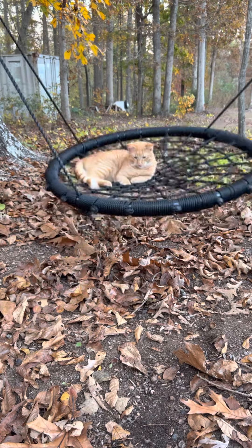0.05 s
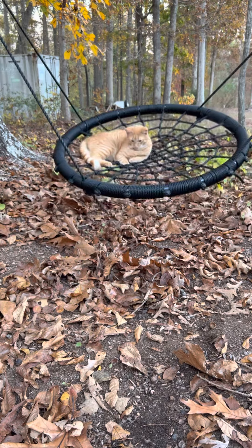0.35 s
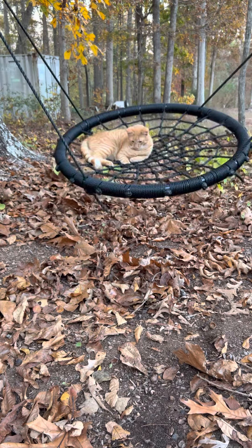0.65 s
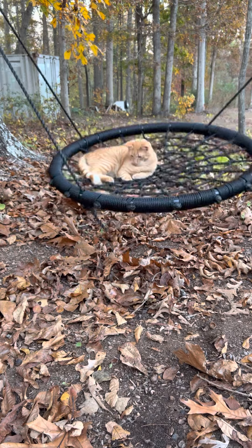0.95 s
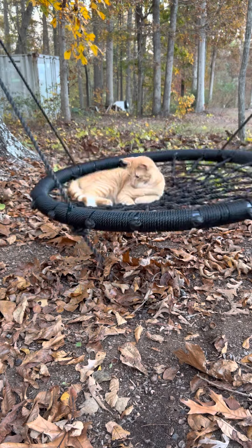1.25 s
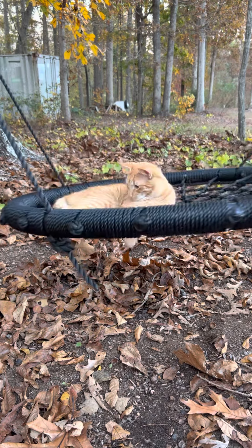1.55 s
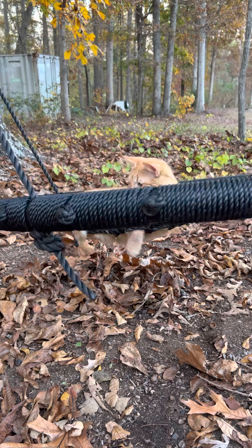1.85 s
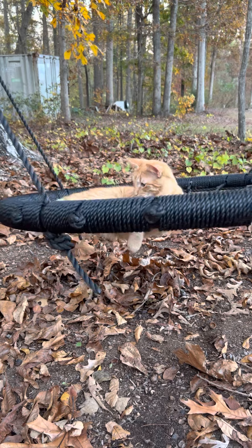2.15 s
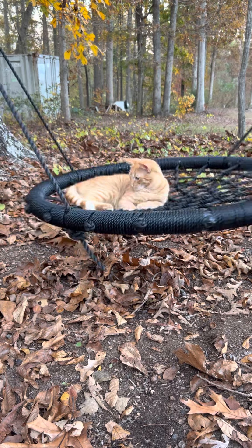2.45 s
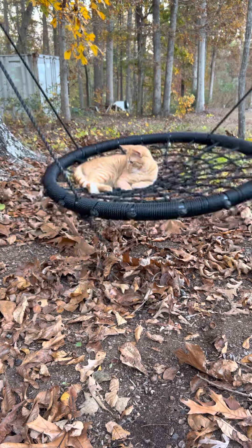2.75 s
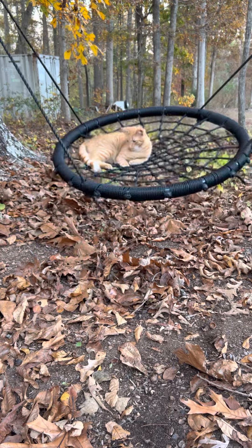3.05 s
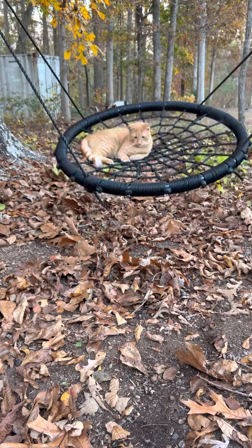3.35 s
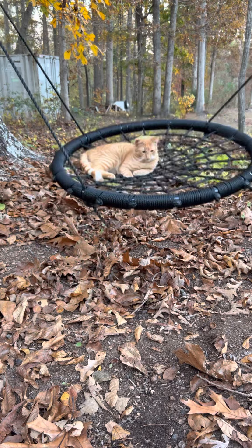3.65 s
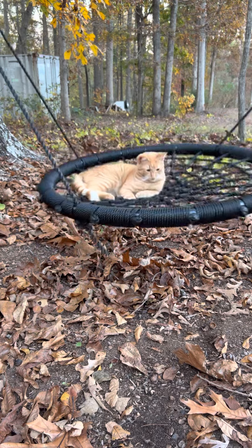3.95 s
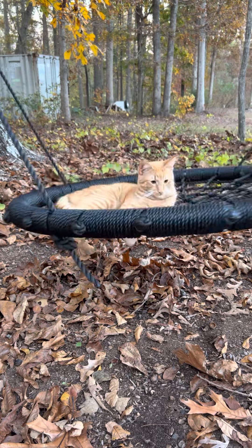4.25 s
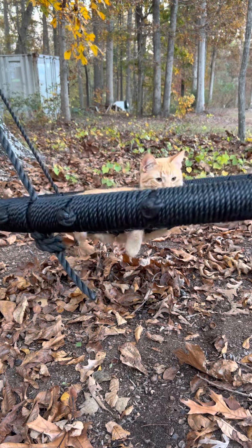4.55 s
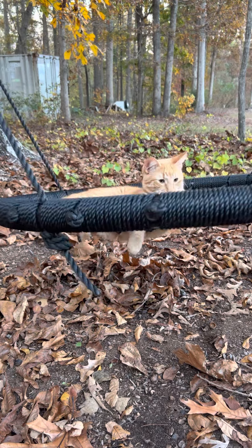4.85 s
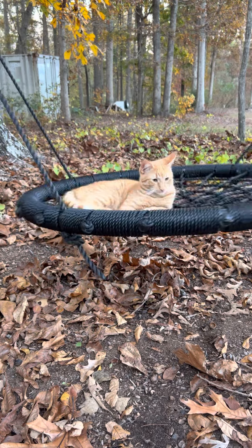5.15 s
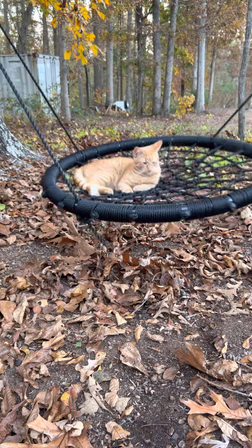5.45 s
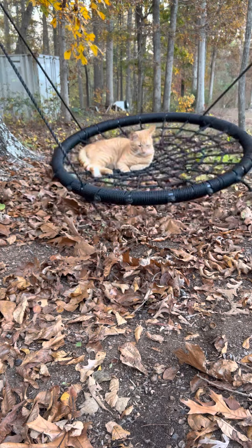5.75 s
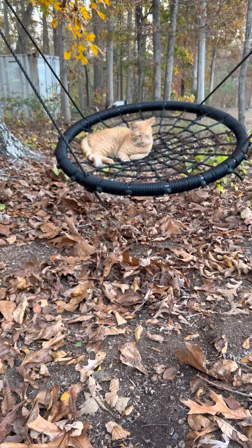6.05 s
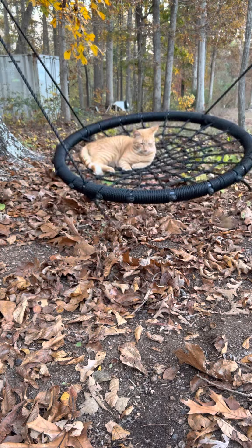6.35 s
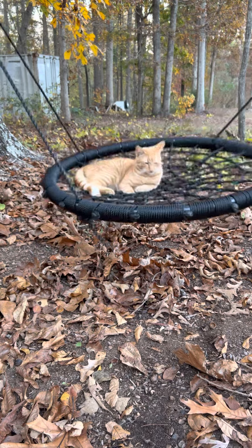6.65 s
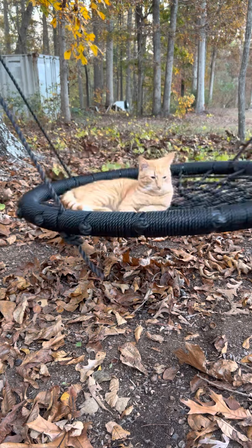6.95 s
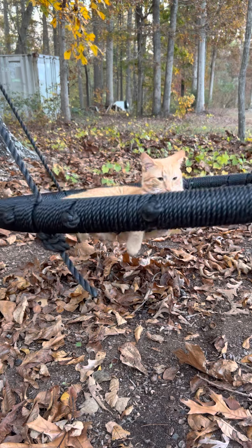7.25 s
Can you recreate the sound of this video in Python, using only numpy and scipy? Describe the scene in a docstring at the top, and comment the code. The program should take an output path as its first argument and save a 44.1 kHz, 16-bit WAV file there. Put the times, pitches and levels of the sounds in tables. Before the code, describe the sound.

A steady high cricket chorus and distant machine drone, with nearby leaf crackles, one sharp snap and a few faint bird whistles.

```python
"""A wooded yard in autumn

Close by, what is probably cloth and dry leaves rustles by stick-slip friction, with a swish, a scuff and
dull ticks; brittle fracture adds snaps and crunches. Crickets trill by stridulation in a steady high
chorus, and another insect, probably a katydid, rasps seven times. Small birds give thin whistles and
faint chucks. Beneath it all lie the harmonics of a far engine, a machine's whine, rumble and open air."""
import sys
import numpy as np
from scipy import signal
from scipy.fft import rfft, irfft
from scipy.io import wavfile
from scipy.ndimage import uniform_filter1d

SR = 44100
rng = np.random.default_rng(int(sys.argv[2]) if len(sys.argv) > 2 else 0)


def put_to_file(sound):
    """Save the sound as 16-bit audio at rate SR, in the file named by the first command-line argument."""
    columns = np.atleast_2d(sound).T  # one column per channel
    safe = np.clip(columns, -1, 1)
    whole_steps = np.round(safe * 32767)
    wavfile.write(sys.argv[1], SR, whole_steps.astype(np.int16))


N = 321930
TIME = np.arange(N) / SR
CRUMBLE_T60_S = .014  # decay time of crumbling leaf fragments


# Leaf fractures (time [s], peak level [dB], tilt [dB/octave], woody knock [dB], ring frequency [Hz])
SNAPS = [(.202, -28, -8.5, 14, 6800), (.2389, -39, -4, 2, 9500), (0.435, -42, -10, 3, 7500),
         (.4925, -39, -7, 2, 8300), (0.5228, -39, -12, 3, 5700), (.627, -42, 0, 3, 8500),
         (.643, -44, -7, 0, 7960), (.7128, -45, -8, 8, 6000), (0.7713, -32.5, -11, 12, 5400),
         (0.8898, -31, -9, 3, 6200), (0.9172, -2, 0, 12, 7800), (1.097, -41, -12.5, 3, 7400),
         (1.105, -40, -12, 3, 6000), (1.204, -28.5, 1, 13, 7300), (1.2607, -32.5, -11, 13, 6150),
         (1.3108, -34, -9, 7, 6300), (1.3534, -39, -10, 1, 7700), (1.3675, -32.5, -7, 7, 6960),
         (1.4325, -32.5, -7, 3, 7600), (1.4677, -37, -9, 4, 7000), (1.5035, -33, -11, 5, 6200),
         (1.5599, -23.5, 3.5, 8, 7000), (1.6173, -33, -14, 6, 6000), (1.6531, -35, -9, 4, 6800),
         (1.738, -43, -7, 3, 7500), (1.76, -46, 2, 2, 8500), (1.8298, -43, -9, 2, 8260),
         (1.8363, -35, -12, 4, 7300), (1.9101, -28.5, -11, 16, 6500), (1.925, -37, -3, 3, 7300),
         (2.154, -22.5, -6, 12, 7500), (2.293, -38, -12.5, 9, 5780), (2.342, -42, -5, 3, 7500),
         (2.3694, -48, -9, 5, 6600), (2.393, -44, -17, 5, 6500), (2.4667, -49, -9, 4, 6800),
         (2.605, -46, -17.5, -2, 6020), (2.778, -37.5, -6.5, 3, 8500), (2.7921, -38, 0, 5, 7000),
         (3.9287, -54, -9, 6, 6940), (4.2794, -56, -4.5, 1.5, 7500), (5.514, -48, -17, 9, 7500),
         (6.1794, -51, -18.5, 3, 7000), (6.5797, -47.5, -11.5, 3, 6500), (6.725, -46.5, -11, 6, 6300),
         (6.8788, -31, 2, 5, 7560)]
# Spectrum common to all snaps (frequency [Hz], level [dB])
SNAP_SPECTRUM = [(300, -35), (2000, -24), (3000, -16), (3650, -9), (4400, -14), (5600, -17), (6400, -8),
                 (7600, -5), (10000, -3), (13000, -5), (16000, -10)]

def snaps(knock_hz=4770, knock_width_hz=380, ring_width_hz=990, ring_db=7, lag_s=.00089, size=1024):
    """Brittle fracture: an impulse excites two resonances; weak snaps crumble more for their size."""
    hz = np.fft.rfftfreq(size, 1 / SR)
    direct, crumbs = np.zeros((2, N)), np.zeros((2, N))
    for time, db, tilt_db, knock_db, ring_hz in SNAPS:
        knock = knock_db * np.exp(-((hz - knock_hz) / knock_width_hz) ** 2)
        ring = ring_db * np.exp(-((hz - ring_hz) / ring_width_hz) ** 2)
        tilt = tilt_db * np.log2((hz + 500) / 8000)
        log_gain = np.log(gain_of(at_hz(SNAP_SPECTRUM, hz) + knock + ring + tilt))
        mirrored = np.r_[log_gain, log_gain[-2:0:-1]]
        left = np.exp(np.conj(signal.hilbert(mirrored)))[:len(hz)]  # minimum phase: a sudden onset
        right = left * np.exp(-1j * at_hz(PORT_PHASE, hz))
        snap = np.roll(irfft([left, right]), size // 2, axis=1)
        snap *= gain_of(db) / abs(snap).max()
        start = time + lag_s - size / 2 / SR
        add(direct, start, snap)
        add(crumbs, start, snap * min(.17 * gain_of(-.7 * db), .8))
    crumbling = scatter(crumbs, CRUMBLE_T60_S)
    near_echo = gain_of(-15) * scatter(direct, t60=.045)
    far_echo = gain_of(-22.5) * scatter(direct, t60=.25)
    return direct + crumbling + near_echo + far_echo


# Rubs (start [s], rise [s], fade delay [s], level [dB], fade [dB/s], fizz relative to the rub [dB])
RUBS = [(.07, .07, 0.14, -56.5, 60, -28), (.2, .01, .05, -55.5, 200, -9), (.24, 0.054, 0.11, -56, 90, -26),
        (.4, 0.02, 0.18, -58, 120, -15), (.56, 0.044, .18, -63.5, 60, -20),
        (1.03, 0.045, .11, -65.5, 60, -19), (1.155, 0.025, 0.05, -55.5, 130, -2.5),
        (1.31, 0.018, .06, -60, 100, -6), (1.372, .012, 0.049, -55.5, 100, -1),
        (1.43, .035, .095, -52, 500, -12), (1.555, 0.023, 0.095, -54, 130, -6.5),
        (1.74, 0.028, 0.095, -62, 120, -7), (1.865, 0.01, 0.075, -58.5, 190, -11),
        (2.025, .02, 0.077, -57, 130, -20), (2.15, 0.027, 0.14, -61, 60, -11),
        (2.275, 0.016, 0.11, -58, 110, -19), (2.69, 0.09, .08, -59, 100, -23),
        (2.765, 0.021, 0.077, -56, 203, -9.5), (2.82, 0.027, 0.16, -60.5, 90.5, -19),
        (3.45, 0.11, .23, -70.5, 130, -18), (3.79, .02, .2, -71.5, 73.5, -20),
        (4.12, .02, 0.035, -76.5, 150, -20), (5.165, .015, .12, -72, 36.5, -22),
        (6.89, .04, 0.064, -62.5, 86, -20), (7.17, .04, .12, -68, 100, -21)]
# Spectra of the rustle's body and of its bright fizz (frequency [Hz], level [dB])
RUSTLE_SPECTRUM = [(60, -9), (140, 9.5), (220, 1.5), (400, 7.5), (800, -4.5), (1500, -6), (2400, 3.5),
                   (3300, 1), (5500, -3.5), (7000, -5), (9000, -12), (12000, -26), (15500, -25.5)]
FIZZ_SPECTRUM = [(4000, -32), (8000, 2.5), (11000, -4), (15500, -8)]

def rustling(stir_db=-82, crackle_db=-8):
    """Friction with uneven grip: rubs shed crackles and fizz on crisp leaves, over a faint steady stir."""
    grip = gain_of(1.5 * drift(45))
    force = grip * rub_envelope([rub[:-1] for rub in RUBS])
    crisp = grip * rub_envelope([(start, rise, delay, db + fizz_db, fade)
                                 for start, rise, delay, db, fade, fizz_db in RUBS])
    body = friction(RUSTLE_SPECTRUM, PORT_BALANCE, slips_per_s=1500, spread_db=4, hiss=1.2, patchy_db=2.5)
    fizz = friction(FIZZ_SPECTRUM, PORT_BALANCE, slips_per_s=1100, spread_db=4, hiss=.9, patchy_db=3)
    return (force + gain_of(stir_db)) * body + crisp * fizz + force * gain_of(crackle_db) * crackles()


def crackles(ticks_per_s=70, width_hz=1700, spread_db=4, modes=10):
    """Damped resonance: single leaves tick at random, each ringing briefly at its own frequency."""
    ticks, radius = np.zeros(N), np.exp(-np.pi * width_hz / SR)
    for hz in np.geomspace(3000, 10000, modes):
        strength = gain_of(spread_db * np.minimum(rng.exponential(1, N), 2))
        train = strength * impulses(ticks_per_s / modes)
        poles = [1, -2 * radius * np.cos(2 * np.pi * hz / SR), radius ** 2]
        ticks += signal.lfilter([1, 0, -1], poles, train)
    spectrum = [(1000, -8.5), (5000, 4), (8000, -7.5), (15000, -17)]
    return ports(ticks + .36 * scatter(ticks, CRUMBLE_T60_S), spectrum, NEAR_COHERENCE)


# One short stroke (start [s], rise [s], fade delay [s], level [dB], fade [dB/s])
SCUFF_STROKE = (6.8145, .03, 0.066, -37.3, 270)
# Its spectrum and its left-minus-right balance (frequency [Hz], level [dB])
SCUFF_SPECTRUM = [(400, -12.5), (800, -10.5), (1400, -6.5), (1850, -13.5), (2300, -0.5), (3300, -4.5),
                  (4600, 2), (5100, -7), (5600, -8), (6100, -6.5), (9000, -13.5), (10200, -20),
                  (15500, -25)]
SCUFF_BALANCE = [(500, 6), (1000, 10), (1800, 7), (2600, -3), (3600, 14), (4350, -5), (5300, 0), (7000, 0)]

def scuff():
    """Coarse stick-slip friction, heard from one side through a level difference between the ports."""
    slips = friction(SCUFF_SPECTRUM, SCUFF_BALANCE, slips_per_s=2300, spread_db=4.5, hiss=1.26, patchy_db=2)
    return rub_envelope([SCUFF_STROKE]) * slips


# One brisk stroke (start [s], rise [s], fade delay [s], level [dB], fade [dB/s])
SWISH_STROKE = (0.77, .008, 0.09, -47.5, 170)
# Its spectrum (frequency [Hz], level [dB])
SWISH_SPECTRUM = [(400, -14.5), (800, -21), (1500, -3), (2400, 4.5), (3300, 0.5), (5000, -2), (5600, -4),
                  (7000, -2), (9000, -4), (12000, -7.5), (15500, -12)]

def swish():
    """Fast sliding friction: dense slips merge into a hiss."""
    slips = friction(SWISH_SPECTRUM, PORT_BALANCE, slips_per_s=4800, spread_db=2.5, hiss=2.2, patchy_db=3.5)
    return rub_envelope([SWISH_STROKE]) * slips


# Collapsing leaves (time [s], level [dB])
CRUNCHES = [(.628, -60.5), (1.227, -52), (1.261, -59), (1.311, -51), (1.381, -48), (1.503, -61),
            (1.832, -56), (1.912, -59), (2.045, -55.5), (2.294, -59), (2.6, -58.5), (2.79, -52),
            (6.168, -65)]
# Their spectrum (frequency [Hz], level [dB])
CRUNCH_SPECTRUM = [(400, -28), (1500, -7), (3000, 3.5), (6500, 5), (9000, 0), (15000, -19)]

def crunches(cracks_per_s=1500):
    """Cascading fracture: a dry leaf gives way in a cluster of tiny cracks that dies quickly."""
    cracks = patchy(noise() * impulses(cracks_per_s), patchy_db=2.5)
    return decays(CRUNCHES, t60=.1) * ports(cracks, CRUNCH_SPECTRUM, NEAR_COHERENCE)


# Short dull ticks (time [s], level [dB])
DULL_TICKS = [(2.298, -46.5), (3.986, -57), (4.032, -61), (4.455, -63), (5.18, -59)]
# Their spectrum (frequency [Hz], level [dB])
TICK_SPECTRUM = [(2000, -19), (3400, -2), (5300, -4), (6300, -26), (12000, -30)]

def dull_ticks():
    """Damped transients: short dull ticks, one of them the bright edge of a far chuck."""
    return decays(DULL_TICKS, t60=.061) * ports(noise(), TICK_SPECTRUM, NEAR_COHERENCE)


# Level of the far chorus (time [s], level [dB])
CHORUS_LEVEL = [(0, -62.5), (2, -62.5), (3.2, -65), (4.1, -62.5), (4.5, -64.5), (5.15, -65), (5.3, -63),
                (7.3, -63)]
# Its spectrum (frequency [Hz], level [dB])
CHORUS_SPECTRUM = [(3000, -68), (3600, -10.5), (3850, -1), (4050, 4), (4220, 6.5), (4400, -1), (4600, -3.5),
                   (4850, -51), (5500, -60)]

def cricket_chorus(wingbeats_hz=(38, 57, 71), throb=.17):
    """Incoherent summation: many far trills merge into one throbbing band of noise."""
    beats = sum(np.sin(phase_of(hz + 3 * drift(2.1))) for hz in wingbeats_hz)
    voices = patchy(noise(), patchy_db=4, size=4096)  # single voices come and go
    voices = voices * (1 + throb * unit_rms(beats))
    return ports(voices, CHORUS_SPECTRUM, FAR_COHERENCE) * gain_of(over_time(CHORUS_LEVEL))


# Nearer crickets, by name (pitch [Hz], wingbeat rate [Hz], phase lead of the left port [rad])
CRICKET_VOICES = {"nearest": (4205, 48.5, 0), "high": (4370, 74, 2.6), "middle": (4215, 66, 0),
                  "low": (4090, 72, 1.1)}
# Their trills (cricket [name], start [s], length [s], level [dB])
TRILLS = [("nearest", 0, 0.075, -61), ("nearest", 1.62, 0.19, -64), ("nearest", 3.715, 0.172, -60.5),
          ("nearest", 5.22, 0.15, -67), ("nearest", 5.735, 0.198, -59.5), ("high", 0.089, 0.43, -65),
          ("high", 1.15, 0.33, -70), ("high", 1.4, 0.2, -62), ("high", 2.3, 0.33, -73),
          ("high", 3.2, 0.347, -65), ("high", 4.72, .22, -66), ("high", 5.5, 0.31, -65),
          ("high", 6.24, 0.223, -62.5), ("middle", 1, 0.13, -77), ("middle", 2.1, .24, -76),
          ("middle", 2.62, 0.082, -69.5), ("middle", 5.7, 0.152, -74.5), ("middle", 7.08, 0.183, -79),
          ("low", 0.91, 0.18, -72.5), ("low", 2.35, 0.212, -69), ("low", 4.6, 0.27, -73),
          ("low", 5.23, 0.34, -72)]

def cricket_trills(strays=30, stray_hz=4210, stray_beats_hz=64.2, stray_s=.3, stray_db=-75):
    """Stridulation: each wing stroke gives a tone pulse; strays farther off trill at random."""
    direct = np.zeros((2, N))
    waver_hz, force = 24 * drift(70), gain_of(2.5 * drift(30))
    trills = [(*CRICKET_VOICES[name], start, length, db) for name, start, length, db in TRILLS]
    for k, (when, pitch, pace, side) in enumerate(rng.random((strays, 4))):
        hz = stray_hz + 240 * (2 * pitch - 1)
        start = (k + when) / strays * N / SR
        trills.append((hz, stray_beats_hz * 2 ** (pace - .5), np.pi * side, start, stray_s, stray_db))
    for hz, wingbeats_hz, lead, start, length, db in trills:
        t = np.arange(start, start + length, 1 / SR)
        stroke = (t - start) * wingbeats_hz % 1
        phase = phase_of(hz + 60 * (.5 - stroke) + np.interp(t, TIME, waver_hz))  # flatter as the wing slows
        pulses = np.sin(np.pi * stroke) * np.interp(t, TIME, force) * signal.windows.tukey(len(t), .2)
        add(direct, start, gain_of(db) * unit_rms(np.sin([phase, phase - lead]) * pulses))
    return direct + gain_of(-8) * scatter(direct, t60=.18)


# Katydid strokes (midpoint [s], length [s], level [dB])
RASPS = [(4.91, 0.097, -63.5), (5.008, 0.13, -62.5), (5.113, 0.1, -57), (5.25, 0.14, -56.5),
         (5.36, 0.13, -55.5), (5.479, 0.1, -54.5), (5.588, 0.086, -55.5)]
# Spectra of a rasp and of the edge it gains as the stroke speeds up (frequency [Hz], level [dB])
RASP_SPECTRUM = [(5200, -38), (6100, -17), (7000, -9), (7800, -0.5), (8800, -7), (10500, -18), (11700, -30),
                 (13000, -53)]
EDGE_SPECTRUM = [(7000, -35), (8600, 2), (9500, 2), (11500, -9), (12600, -32)]

def katydid(teeth_hz=270, grain=.21, swell=1.68, edge_db=-5):
    """File-and-scraper stridulation: tooth strikes swell, brighten, stop quickly and echo in the trees."""
    strokes, edges = np.zeros(N), np.zeros(N)
    for middle, length, db in RASPS:
        along = np.linspace(0, 1, int(length * SR))
        stroke = gain_of(db) * np.sin(np.pi * along ** swell)
        add(strokes, middle - length / 2, stroke)
        add(edges, middle - length / 2, gain_of(edge_db) * stroke * along ** 2)
    teeth = 1 + grain * np.cos(phase_of(teeth_hz + 25 * drift(7.95)))
    coherence = [(7500, .87), (12000, .88)]
    direct = sum(force * ports(patchy(noise() * teeth, patchy_db=3.5), spectrum, coherence)
                 for force, spectrum in [(strokes, RASP_SPECTRUM), (edges, EDGE_SPECTRUM)])
    return direct + gain_of(-4.5) * scatter(direct, t60=.32)


# Whistles (start [s], length [s], first pitch [Hz], last pitch [Hz], relative level [dB], quaver [ratio])
WHISTLES = [(1.65, 0.27, 6600, 6540, -72, .018), (3.3, 0.11, 6160, 6370, -67.5, .024),
            (3.41, 0.17, 6300, 6220, -80, .008), (5.165, 0.15, 6400, 6430, -70.5, .007),
            (6.93, 0.3, 6390, 6320, -76, .008)]

def bird_whistles():
    """Frequency modulation: thin tones glide and quaver, blurred by the wood's reverberation."""
    direct, quaver = np.zeros(N), drift(150)
    for start, length, first_hz, last_hz, db, depth in WHISTLES:
        glide = np.linspace(first_hz, last_hz, int(length * SR))
        hz = glide * (1 + depth * quaver[int(start * SR):][:len(glide)])
        tone = np.sin(phase_of(hz)) * signal.windows.tukey(len(hz), .4)
        add(direct, start, gain_of(db) * unit_rms(tone))
    return .45 * direct + .7 * scatter(direct, t60=.45)


# Far bird notes (midpoint [s], direct level [dB])
CHUCKS = [(4.18, -72), (4.465, -70), (4.69, -69.5), (4.905, -68)]
# Their spectrum (frequency [Hz], level [dB])
CHUCK_SPECTRUM = [(1200, -41), (2100, 3.5), (2600, -1.5), (3100, 1.5), (3700, -21.5), (5200, -16),
                  (6400, -18), (8000, -36)]

def bird_chucks(length_s=.047):
    """Beyond the critical distance: short hoarse notes carry more reverberation than direct sound."""
    notes = np.zeros(N)
    for middle, db in CHUCKS:
        add(notes, middle - length_s / 2, gain_of(db) * signal.windows.hann(int(length_s * SR)))
    direct = notes * ports(noise(), CHUCK_SPECTRUM, NEAR_COHERENCE)
    return direct + gain_of(6.5) * scatter(direct, t60=.27)


# Engine speed (time [s], firing rate [Hz])
FIRING_RATE = [(0, 99.63), (2.5, 98.48), (3.8, 98.8), (5.1, 98.97), (6.3, 97.9), (7.3, 95.95)]
# Its harmonics (order [multiple of the firing rate], relative level [dB])
ENGINE_ORDERS = [(1, 5), (2, 1), (3, -10.5)]
# Overtone strength under load (time [s], gain per order above the first [dB])
ENGINE_LOAD = [(0, -1.5), (2.3, -5), (2.8, 0), (7.3, 0)]

def engine(base_db=-64, growth_db=13.3, time_constant_s=3.4):
    """Periodic firing gives a harmonic series, which grows louder as its pitch sags."""
    phase = phase_of(over_time(FIRING_RATE) + .25 * drift(3))
    load_db = over_time(ENGINE_LOAD)
    drone = sum(gain_of(db + (order - 1) * load_db + drift(2.8)) * np.sin(order * phase)
                for order, db in ENGINE_ORDERS)
    return drone * gain_of(base_db + growth_db * (1 - np.exp(-TIME / time_constant_s)))


# A second machine runs up, then eases off (time [s], pitch [Hz])
WHINE_PITCH = [(0, 318), (.6, 318), (1.4, 324.5), (3.5, 325.3), (6.1, 324), (7.3, 322)]
# Its fundamental and its octave (time [s], level [dB])
WHINE_LEVEL = [(0, -60.5), (.3, -62.5), (.5, -69.5), (.68, -58.5), (.88, -83), (1.08, -57.5), (1.27, -71.5),
               (1.45, -63.5), (1.65, -69), (2.35, -59.5), (2.85, -66), (3.1, -62.5), (3.5, -62.5),
               (3.7, -71), (4.35, -61), (4.6, -67), (5.2, -63.5), (5.8, -64.5), (6.2, -60), (6.5, -65),
               (6.95, -59), (7.3, -61)]
OCTAVE_LEVEL = [(0, -87), (1.2, -87), (1.9, -68.5), (2.4, -80), (3.4, -75.5), (4.5, -83), (5.9, -74.5),
                (6.7, -77.5), (7.3, -81.5)]

def machine_whine():
    """Atmospheric fading: moving air makes a far tone and its octave waver separately."""
    phase = phase_of(over_time(WHINE_PITCH) + 1.2 * drift(6))
    fundamental = gain_of(over_time(WHINE_LEVEL) + 1.1 * drift(15)) * unit_rms(np.sin(phase))
    octave = gain_of(over_time(OCTAVE_LEVEL) + 1.3 * drift(2.6)) * unit_rms(np.sin(2 * phase))
    return fundamental + octave


# Spectra of the rumble and of the open-air wash (frequency [Hz], level [dB])
RUMBLE_SPECTRUM = [(12, -24), (25, -51.5), (45, -2), (70, 0), (105, -4), (140, -9), (170, -13.5),
                   (250, -16), (400, -22.5), (600, -33), (1200, -83)]
WASH_SPECTRUM = [(200, -0.5), (500, 1), (800, 1.5), (1250, -1), (1700, -7.5), (2200, -8.5), (2800, -15),
                 (3500, -12.5), (5200, -33), (7000, -29), (9000, -34), (13000, -34.5), (16000, -47.5)]
# Course of the wash (time [s], relative level [dB])
WASH_LEVEL = [(0, 0.9), (2.8, 1.5), (4.5, -0.57), (7.3, -3)]

def open_air(rumble_db=-50.5, wash_db=-60.5):
    """Broadband ambient noise: a low rumble rises slightly while a soft wash slowly fades."""
    wash_gain = gain_of(wash_db + over_time(WASH_LEVEL) + .72 * drift(6.5))
    rumble_gain = gain_of(rumble_db + over_time([(0, -1), (7.3, 1)]))
    rumble = ports(noise(), RUMBLE_SPECTRUM, FAR_COHERENCE)
    wash = ports(patchy(noise(), patchy_db=1, size=2048), WASH_SPECTRUM, FAR_COHERENCE)
    return rumble_gain * rumble + wash_gain * wash


# Left-right likeness of far and of near sound (frequency [Hz], coherence [0-1])
FAR_COHERENCE = [(100, 1), (330, 0.87), (520, 0.3), (750, 0.1), (1200, 0.23), (1700, 0.79), (2300, 0.7),
                 (3000, 0.4), (4100, 0.14), (5000, 0.98), (5600, .3), (7000, 0.3), (14000, .4)]
NEAR_COHERENCE = [(300, 0.83), (900, 0.24), (1700, 0.85), (2800, 0.86), (3500, 0.3), (4100, 0.5),
                  (5300, 0.063), (6300, 0.53), (14000, 0.43)]
# Lead of the left microphone port (frequency [Hz], phase [rad])
PORT_PHASE = [(350, 0), (1700, .6), (2300, 2), (2800, 3.15), (3400, 3.4), (4200, 1.6), (4800, 3.2),
              (5600, 6.1), (6300, 5.1), (14000, 4.9)]
# Left port minus right port (frequency [Hz], level [dB])
PORT_BALANCE = [(350, 0.5), (1100, 5), (1800, 3), (2600, -1), (3500, 1.5), (4200, 2.5), (4900, -2.5),
                (6000, 0.3)]

def ports(pair, spectrum, coherence, balance=PORT_BALANCE, bass_hz=330):
    """Partial coherence: two signals are blended and coloured as two microphone ports hear them."""
    hz = np.fft.rfftfreq(N, 1 / SR)
    common, unrelated = rfft(pair)
    apart = 1 - np.exp(-(hz / bass_hz) ** 4)  # long waves reach both ports alike
    alike = np.clip(at_hz(coherence, hz), 0, 1)
    lean = gain_of(apart * at_hz(balance, hz) / 2)
    lag = np.exp(-1j * apart * at_hz(PORT_PHASE, hz))
    right = (alike * common + np.sqrt(1 - alike ** 2) * unrelated) * lag
    return unit_rms(irfft(np.array([common * lean, right / lean]) * gain_of(at_hz(spectrum, hz)), N))


def friction(spectrum, balance, slips_per_s, spread_db, hiss, patchy_db):
    """Stick-slip motion: countless tiny slips of uneven size and pitch over a smooth hiss."""
    sizes = gain_of(spread_db * np.minimum(rng.exponential(1, N), 3)) * impulses(slips_per_s)
    slips = unit_rms(sizes * noise()) + hiss * noise()
    return ports(patchy(slips, patchy_db), spectrum, NEAR_COHERENCE, balance)


def rub_envelope(rubs):
    """Linear rise, hold and exponential decay for each rub; the strongest prevails."""
    gains = [np.clip((TIME - start) / rise, 0, 1) * gain_of(db - fade * np.maximum(TIME - start - delay, 0))
             for start, rise, delay, db, fade in rubs]
    return np.max(gains, axis=0)


def decays(events, t60):
    """Exponential decay: an envelope that jumps at each event and falls 60 dB per t60 seconds."""
    t, envelope = np.arange(SR // 10) / SR, np.zeros(N)
    for time, db in events:
        add(envelope, time, gain_of(db - 60 * t / t60))
    return envelope


def scatter(x, t60):
    """Diffuse reverberation: dense dying reflections, different at each port."""
    t = np.arange(SR // 2) / SR
    tail = rng.standard_normal((2, len(t))) * gain_of(-60 * t / t60)
    return signal.fftconvolve(np.atleast_2d(x), tail / np.linalg.norm(tail[0]), axes=1)[:, :N]


def patchy(x, patchy_db, size=256):
    """Spectral modulation: random patches of time and frequency are lifted or lowered."""
    frames = dict(nperseg=size, noverlap=size - size // 4)
    cells = signal.stft(x, **frames)[2]
    field = rng.standard_normal(cells.shape[-2:])
    field = uniform_filter1d(uniform_filter1d(field, 5, axis=0), 5, axis=1)
    return signal.istft(cells * gain_of(patchy_db * unit_rms(field)), **frames)[1][..., :N]


def drift(rate_hz, size=2048):
    """Low-pass noise of rms 1, wandering at up to about the given rate."""
    hz = np.fft.rfftfreq(size, N / SR / size)
    slow = irfft(rfft(rng.standard_normal(size)) * np.exp(-(hz / rate_hz) ** 2))
    return unit_rms(np.interp(TIME, np.linspace(0, N / SR, size), slow))


def noise():
    """Two uncorrelated white noises."""
    return rng.standard_normal((2, N))


def impulses(per_s):
    """A Poisson train of unit impulses."""
    return rng.random(N) < per_s / SR


def phase_of(hz):
    """Phase in radians, the integral of frequency."""
    return 2 * np.pi * np.cumsum(hz) / SR


def gain_of(db):
    """Decibels to amplitude."""
    return 10 ** (np.asarray(db) / 20)


def unit_rms(x):
    """Normalisation to an rms of 1."""
    return x / np.sqrt(np.mean(abs(x) ** 2) + 1e-20)


def at_hz(points, hz):
    """Interpolation on a log-frequency axis."""
    frequencies, values = np.transpose(points)
    return np.interp(np.log(hz + 1), np.log(frequencies + 1), values)


def over_time(points):
    """Linear interpolation in time."""
    return np.interp(TIME, *np.transpose(points))


def add(mix, start_s, sound):
    """Superposition of a sound on the mix, from start_s on."""
    part = mix[..., max(round(start_s * SR), 0):][..., :sound.shape[-1]]
    part += sound[..., :part.shape[-1]]


def scene():
    """Superposition of the near rustling, the animals and the far background."""
    strokes = swish() + scuff()
    animals = cricket_chorus() + cricket_trills() + katydid() + bird_whistles() + bird_chucks()
    background = open_air() + engine() + machine_whine()
    return rustling() + crunches() + dull_ticks() + snaps() + strokes + animals + background


def record(dry):
    """Band limiting: a linear-phase low-pass filter removes the highest treble."""
    lowpass = signal.firwin(301, cutoff=15900, window=("kaiser", 9), fs=SR)
    return signal.oaconvolve(dry, lowpass[None], "same", axes=1)


dry = scene()
out = record(dry)
put_to_file(out)
```